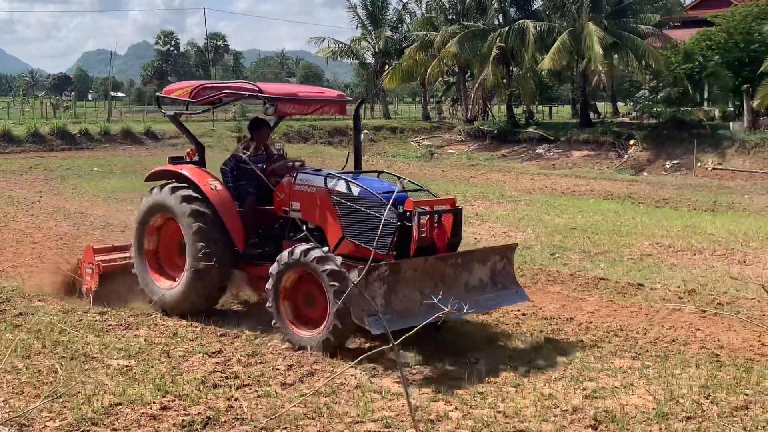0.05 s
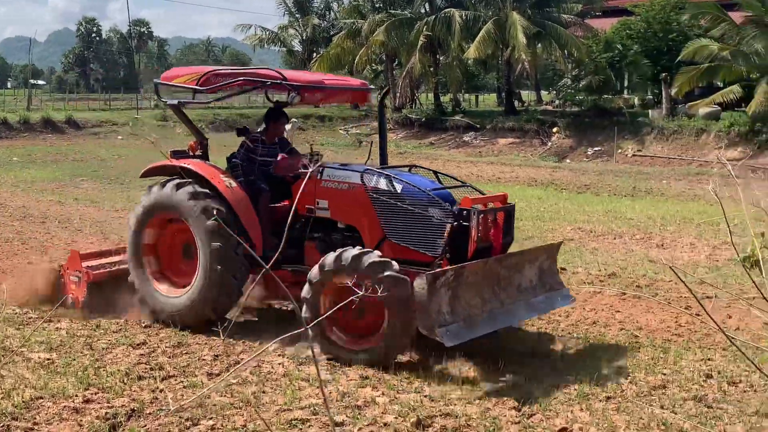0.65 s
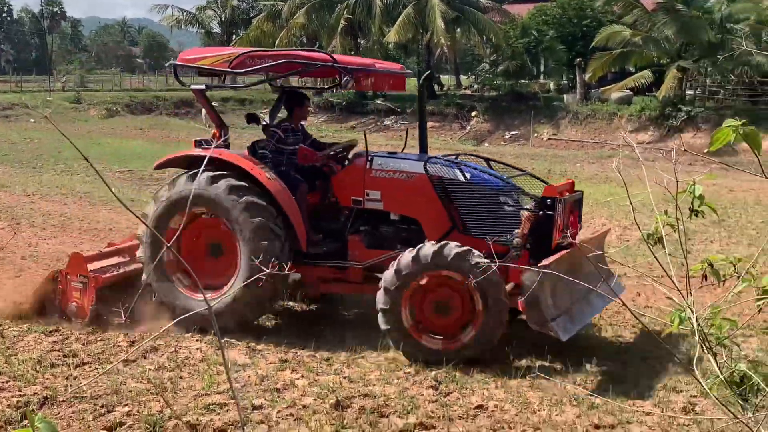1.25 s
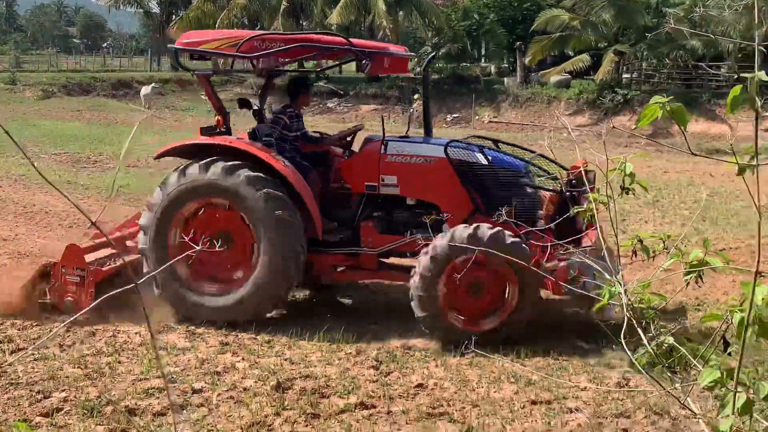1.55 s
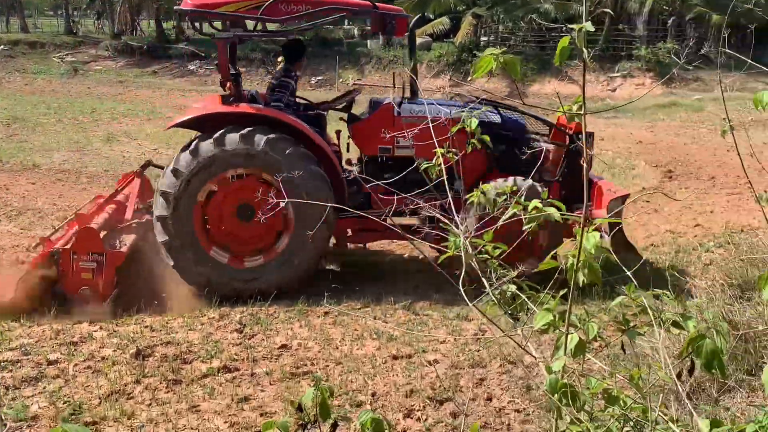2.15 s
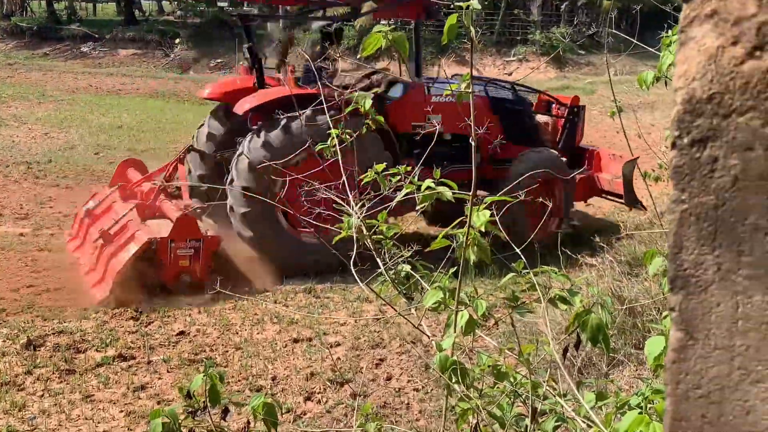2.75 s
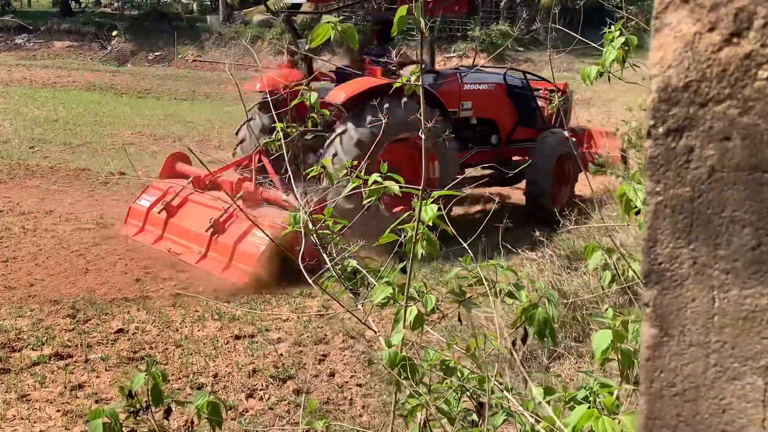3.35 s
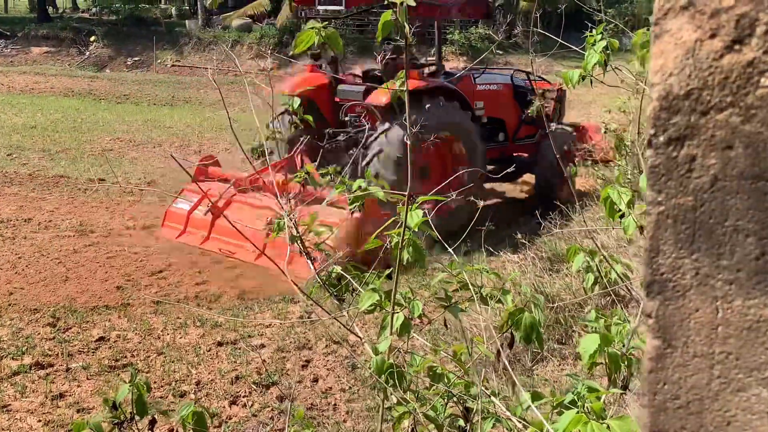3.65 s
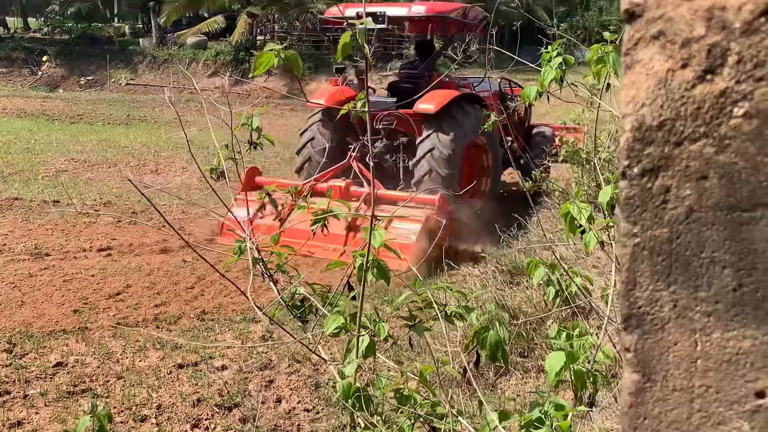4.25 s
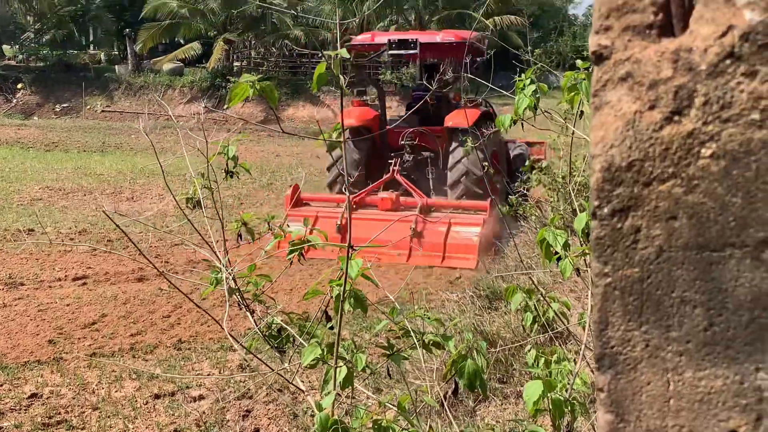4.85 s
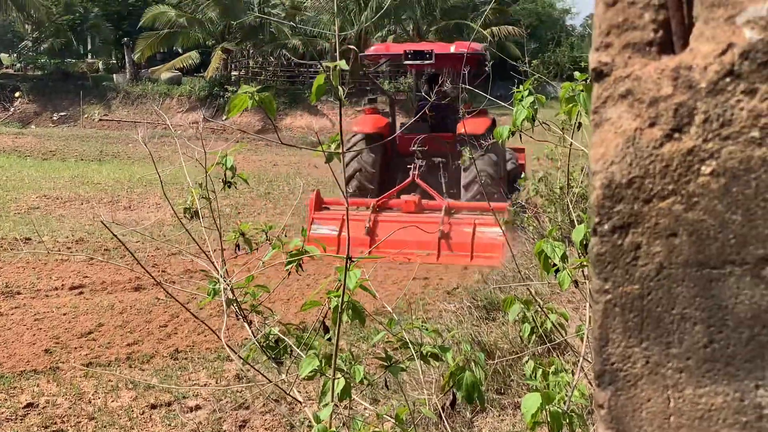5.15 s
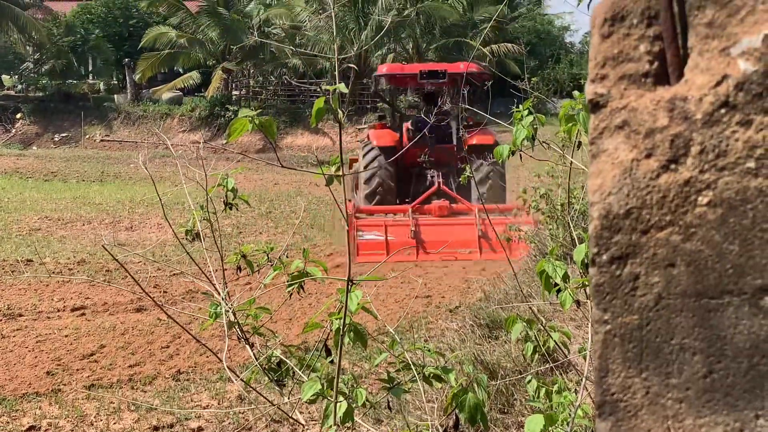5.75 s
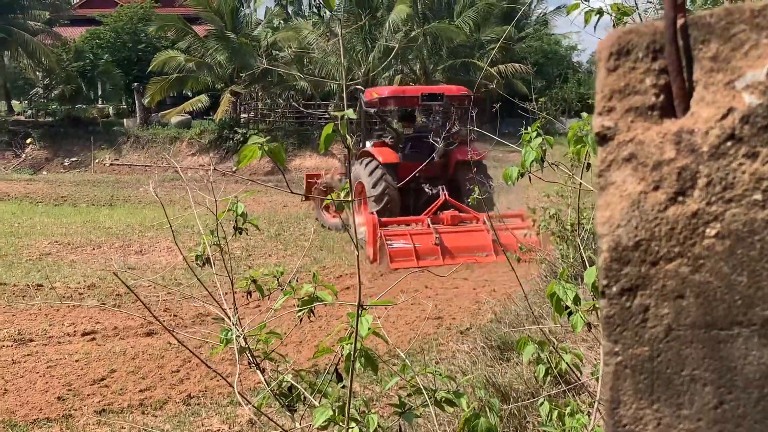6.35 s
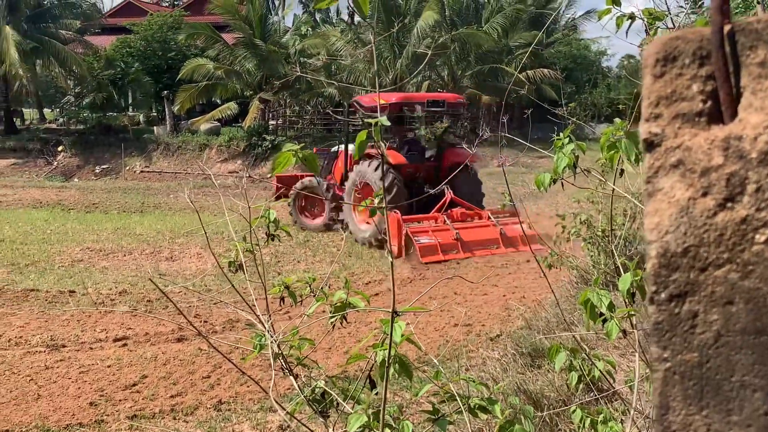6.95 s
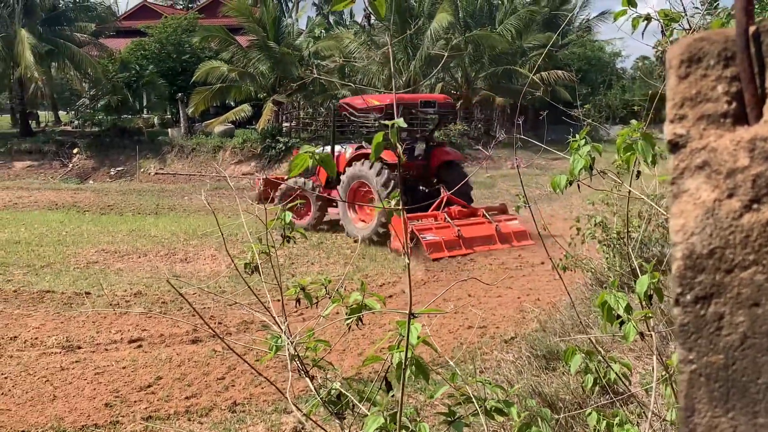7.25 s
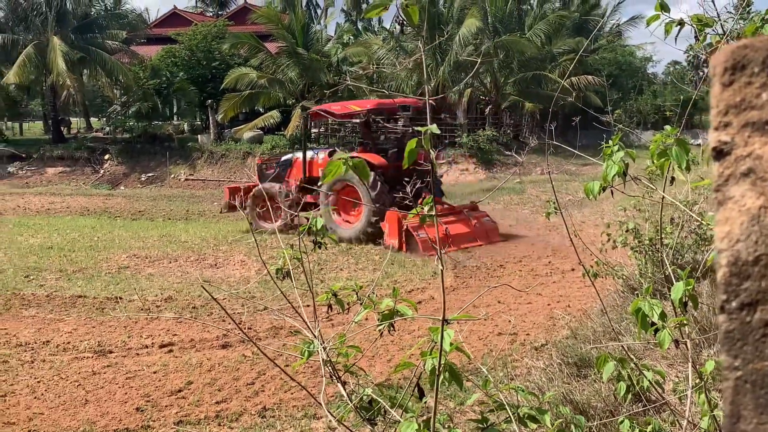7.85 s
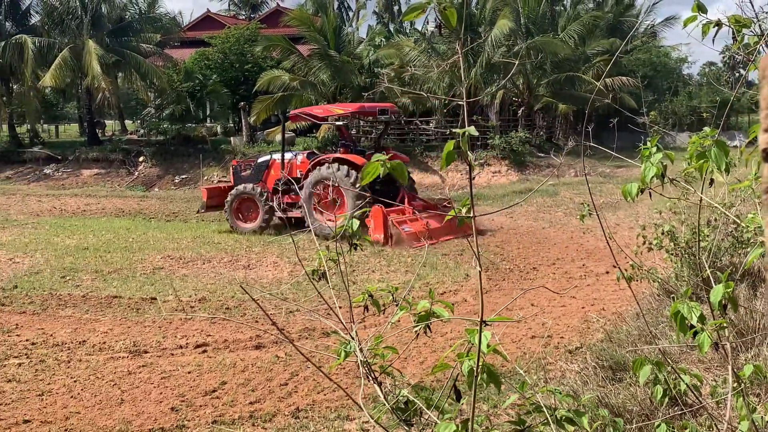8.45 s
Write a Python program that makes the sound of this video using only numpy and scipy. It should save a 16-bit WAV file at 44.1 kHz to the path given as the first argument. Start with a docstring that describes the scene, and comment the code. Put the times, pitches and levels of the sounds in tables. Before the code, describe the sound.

A tractor engine runs steadily, nearing and moving off while its tiller rumbles through earth, with chattering metal and small stone strikes.

```python
"""A four-cylinder diesel tractor approaches at steady revs with a rotary tiller: exhaust pulses drone,
firings make the block knock, gears whine and blades rumble through dry soil. After two seconds it
passes side-on; the tiller's loose flap starts to chatter and small clods fly. As the tractor turns
away its body shadows the engine, dry steel squeaks, and clods and stones strike the hood amid a few
crisp, high cracks. From six seconds on, farther off across the field, a loose pin clinks."""
import sys
import numpy as np
from scipy import signal
from scipy.fft import rfft, irfft, next_fast_len
from scipy.io import wavfile

SR = 44100
rng = np.random.default_rng(int(sys.argv[2]) if len(sys.argv) > 2 else 0)


def inscribe(sig):
    """Save sig as 16-bit PCM at rate SR to the path in sys.argv[1].

    A 1-D sig is mono; a 2-D sig holds one channel per row.
    Samples are clipped to [-1, 1] before scaling.
    """
    pcm = np.round(np.clip(np.atleast_2d(sig).T, -1, 1) * 32767)
    wavfile.write(sys.argv[1], SR, pcm.astype(np.int16))


N = 374409
TIME = np.arange(N) / SR

# The tractor's path: time_s, distance_m, view_deg (0 from the nose, 90 side-on, 180 from behind)
TRACTOR_PATH = [(0, 12.1, 48.3), (1, 10.57, 64.4), (2, 10.52, 95.6), (3, 11, 124.5), (4, 10.8, 155.3),
                (5.5, 14.45, 185), (6.5, 14, 160.5), (7.2, 16.9, 140), (8.49, 17.5, 126.4)]
# Engine speed: time_s, firing_rate_hz
FIRING_RATE = [(0, 69.85), (1.2, 69.7), (2, 69.5), (4.2, 69.5), (5.6, 69.25), (6.3, 69.7), (7.2, 68.6),
               (7.8, 69.1), (8.49, 69.55)]
# Directivity of the three lowest firing harmonics: view_deg, first_db, second_db, third_db
EXHAUST_DIRECTIVITY = [(45, -23.5, -23, -32.5), (73.5, -24, -25, -47), (90.6, -23.5, -29, -34),
                       (106, -26, -37, -37.5), (116.8, -28.5, -27.5, -31.5), (140, -29.5, -25.5, -35.5),
                       (162.4, -31, -29.5, -34.5), (176, -26, -31, -31.5), (180.7, -27, -37, -37)]
# Tones from unequal cylinders: multiple_of_cycle_rate, front_db, rear_db
UNEVEN_ORDERS = [(5, -37, -51), (6, -42, -42.5), (9, -37.5, -49), (10, -39.5, -48.5), (11, -47, -60),
                 (13, -53, -44.5), (14, -58, -42), (16, -60, -42.5), (17, -42, -47), (18, -41.5, -55),
                 (19, -48, -56.5), (23, -48, -68), (26, -48.5, -50.5), (27, -52, -53.5), (29, -46, -58.5),
                 (30, -51, -67)]
# The seventh cycle harmonic, which beats with the second firing harmonic: time_s, level_db
CHUG_LEVEL = [(0, -34.5), (1, -29), (2, -30), (2.5, -41), (6.3, -44), (7.1, -33.5), (7.5, -38.5),
              (8.49, -37)]
# Spectra of the engine's drone, block knock and valve tick: frequency_hz, relative_db
DRONE_SPECTRUM = [(130, -24), (230, -6.5), (330, 0.5), (430, -5), (520, -5.5), (610, -6), (680, -13),
                  (900, -12.5), (1500, -34)]
KNOCK_SPECTRUM = [(500, -25), (690, -10), (800, -2.5), (910, -7.5), (1060, 0.5), (1220, -1.5), (1400, -1),
                  (1600, -6), (1750, -7.5), (1920, -6.5), (2250, -9), (2600, -16.5), (3200, -60)]
TICK_SPECTRUM = [(1800, -5), (2550, -8), (2800, 2.5), (3020, 0), (3300, 3), (3530, -2), (3720, 1.5),
                 (4600, -4.5), (5600, -6.5), (6400, -5.5), (7400, -12), (8800, -9), (11500, -11),
                 (14000, -15)]
# Modes of the thin engine covers: pitch_hz, bandwidth_hz, gain_over_tick_db, aim_deg
COVER_MODES = [(2830, 110, -4, 48), (3200, 150, 2.5, 50), (3000, 160, -1, 69), (3690, 80, 3.5, 67),
               (3370, 160, -2, 83), (2810, 300, -5.5, 108), (4250, 160, -4, 100), (5060, 130, 0, 62)]
# Directivity of the drive's tones: view_deg, gearbox_hum_db, tiller_mesh_db, howl_db
GEAR_DIRECTIVITY = [(45, -41, -42, -44), (57, -38, -37.5, -43), (68, -31.5, -43, -45),
                    (92, -30, -35.5, -37), (103, -43, -55, -44), (113, -45, -58, -50), (122, -34, -50, -48),
                    (128, -36, -39, -44), (134, -38.5, -32.5, -38.5), (141, -42, -34.5, -40),
                    (145, -48, -41, -42.5), (151, -51, -41, -48), (158, -52, -49, -49),
                    (186, -53, -47, -55)]
# Wavering gear and fan tones: pitch_hz, bandwidth_hz, level_over_knock_db
WHINE_TONES = [(810, 23, -22), (1405, 23, -16), (1893, 36, -18), (2210, 19, -24.5), (3775, 24, -18),
               (5160, 200, -16), (8200, 67, -18.5)]
# The tiller's gear mesh: time_s, pitch_hz
MESH_CURVE = [(0, 1402), (1.8, 1394), (3.3, 1385), (7, 1379), (7.4, 1374), (7.9, 1388), (8.49, 1402)]
# Spectra of churned soil, sprayed fine earth and settling dust: frequency_hz, relative_db
RUMBLE_SPECTRUM = [(15, -30), (33, -23), (50, -9), (70, -3.5), (95, 5), (125, -1), (165, -2), (210, -6),
                   (270, -8.5), (350, -20), (450, -20), (560, -36.5)]
SPRAY_SPECTRUM = [(3000, -41), (7000, 4.5), (10500, 9.5), (14000, 4)]
DUST_SPECTRUM = [(7000, -16), (11500, 0), (14000, 4)]
# Modes of the tiller's sheet-steel hood: pitch_hz, bandwidth_hz, gain_db
HOOD_MODES = [(564, 150, -1), (900, 200, -3), (1290, 100, 10), (2800, 110, -3.5), (3460, 150, 9.5),
              (4000, 150, 9), (6350, 76, 2), (6520, 96, 2.5)]
# Spectrum of the loose flap: frequency_hz, relative_db
FLAP_SPECTRUM = [(2400, -11), (2850, 3.5), (3500, 2), (4300, -4), (5200, -29)]
# Big clods bursting on the hood: start_s, relative_db, t60_s
CLOD_HITS = [(3.582, -25.5, 0.049), (3.752, -30, .09), (3.897, -28, 0.081), (4.046, -29, 0.049),
             (4.541, -32, 0.04), (4.685, -36, 0.045), (4.796, -32, .07), (4.816, -32, 0.15),
             (5.419, -35, 0.2), (5.695, -34, 0.066), (6.33, -30.5, 0.045), (6.403, -35.5, .06),
             (6.54, -32, 0.026), (7.258, -30.5, 0.08), (7.69, -29, 0.09), (7.989, -29.5, .16),
             (8.131, -32.5, 0.035), (8.303, -30, 0.12)]
# Rubs of dry steel on the tiller: start_s, length_s, level_db
STEEL_RUBS = [(3.232, .035, -37.5), (3.503, .017, -28), (3.543, .02, -42), (3.738, .012, -38),
              (3.79, .012, -36.5), (3.825, .04, -39.5), (4.07, .03, -43.5), (4.168, .02, -46),
              (4.208, .03, -41.5), (4.648, .015, -47), (4.85, .02, -47), (4.935, .03, -42.5),
              (4.98, .02, -47)]
# Crisp high cracks, two on their own, three the sharp top of stone hits: start_s, relative_db, t60_s
BRIGHT_CRACKS = [(4.214, -34.5, .06), (4.2843, -17.5, 0.004), (4.341, -36, .025), (4.448, -36, .025),
                 (5.405, -32, .025)]
# Stones cracking against the blades: start_s, relative_db, t60_s, hood_drive_db
STONE_HITS = [(4.339, -31.5, .04, -7), (4.447, -32.5, .045, -9), (4.809, -29, .05, -11),
              (5.403, -26.5, .05, -13), (5.544, -32.5, .035, -14), (5.66, -38, .05, -12),
              (6.147, -34, .025, 3), (6.571, -35, .02, -6)]
# Jolts of the loose pin: start_s, level_db
PIN_JOLTS = [(6.148, -34), (6.403, -39), (6.456, -42), (6.772, -42), (6.92, -36), (7.014, -35),
             (7.408, -35), (7.704, -38), (7.959, -38), (8.131, -34), (8.304, -41)]
# Modes of the pin: pitch_hz, gain_db, t60_s
PIN_MODES = [(5730, -8, .03), (6350, -1.5, 0.073), (6560, -12, .03)]
# Sound scattered by ground and bushes: frequency_hz, relative_db
SCATTER_SPECTRUM = [(100, -44), (250, -21), (500, -6), (1000, -9), (2000, -3.5), (4000, -6.5), (9000, -3),
                    (12000, -30.5)]
# Level difference between two close microphones: frequency_hz, left_minus_right_db
STEREO_LEVEL = [(60, -2.5), (130, -3), (250, -4), (500, -2), (1000, 1.5), (1400, -0.5), (1900, 5),
                (2700, 0.5), (4200, 1), (5200, -3.5), (7500, 1.5), (8400, -3), (10000, 0)]
# Their phase difference: frequency_hz, left_lead_rad
STEREO_PHASE = [(100, -.1), (450, -.2), (650, .5), (1000, -.35), (2100, -.4), (3000, .7), (4100, 0),
                (4800, .5), (5250, 2), (5700, .3), (7000, .3), (7900, -.7), (8400, -3.3), (9400, -4.2),
                (9750, -6.2), (10600, -6.5), (11400, -9.3), (12300, -9.5), (13200, -12.5), (13900, -12.7),
                (14700, -15.7)]

REFERENCE_M = 10   # distance at which the spreading gain is 0 dB
HUM_HZ, SHAFT_HZ, SQUEAK_HZ = 408.7, 1458, 5080
COVER_BEAM_DEG, SHAFT_BEAM_DEG, SPRAY_AIM_DEG = 8, 43, 108
FLANK_DEG, FLANK_WIDTH_DEG = 102, 4   # where the rear's timbre takes over, and how gradually
HARD_RISE, SOFT_RISE = .025, .05   # a burst's attack as a share of its t60


def from_db(db):
    """Amplitude ratio: tenfold for every 20 dB."""
    return 10 ** (np.asarray(db) / 20)


def rms_one(x):
    """Normalisation to unit power."""
    return x / np.sqrt(np.mean(x ** 2) + 1e-20)


def in_time(rows):
    """Linear interpolation of each column at every sample."""
    times, *columns = np.transpose(rows)
    return [np.interp(TIME, times, column) for column in columns]


def at_hz(points, hz):
    """Interpolation on a logarithmic frequency axis."""
    known_hz, values = np.transpose(points)
    return np.interp(np.log(hz), np.log(known_hz), values)


def filtered(x, response):
    """Linear filtering: the spectrum is multiplied by response(hz)."""
    size = next_fast_len(N + 8192, real=True)
    hz = np.maximum(np.arange(size // 2 + 1) * SR / size, 1)
    return irfft(rfft(x, size) * response(hz), size)[..., :N]


def coloured(x, spectrum):
    """Spectral shaping to unit power, with a steep roll-off an octave beyond each end."""
    low_hz, high_hz = spectrum[0][0] / 2, 2 * spectrum[-1][0]
    roll_off = lambda hz: 1 + (hz / high_hz) ** 4 + (low_hz / hz) ** 4
    return rms_one(filtered(x, lambda hz: from_db(at_hz(spectrum, hz)) / roll_off(hz)))


def resonance(x, hz, width_hz):
    """A damped resonator with unit gain at its peak."""
    r = np.exp(-np.pi * width_hz / SR)
    feedback = [1, -2 * r * np.cos(2 * np.pi * hz / SR), r * r]
    return signal.lfilter(np.array([1, 0, -1]) * (1 - r * r) / 2, feedback, x + 1e-18)


def drift(rate_hz):
    """Random modulation: unit-power noise, low-passed at rate_hz."""
    step = 40
    r = np.exp(-2 * np.pi * rate_hz * step / SR)
    slow = signal.lfilter([1], [1, -2 * r, r * r], rng.standard_normal(N // step + 2002))[2000:]
    return np.interp(np.arange(N) / step, np.arange(len(slow)), rms_one(slow))


def wavering(turns, width_hz):
    """Narrow-band noise: two random amplitudes in quadrature."""
    phase = 2 * np.pi * turns
    return rms_one(drift(width_hz) * np.cos(phase) + drift(width_hz) * np.sin(phase))


def tone(turns, flutter):
    """A sinusoid near unit power, with slight amplitude and phase modulation."""
    phase = 2 * np.pi * turns + flutter * drift(.71)
    return np.sqrt(2) * (1 + flutter * drift(3.9)) * np.sin(phase)


def view_angle():
    """Angle of radiation: degrees between the tractor's nose and the listener."""
    return in_time(TRACTOR_PATH)[1]


def spreading(loss_db_per_m=0):
    """Gain in dB from spherical spreading and absorption by soft soil and bushes."""
    metres, _ = in_time(TRACTOR_PATH)
    return -20 * np.log10(metres / REFERENCE_M) - loss_db_per_m * (metres - REFERENCE_M)


def beamed(pattern):
    """Directivity and spreading set each tone's level in dB along the path."""
    angles, *columns = np.transpose(pattern)
    return spreading() + np.array([np.interp(view_angle(), angles, column) for column in columns])


def shadowed(front_db, hidden_db, loss_db_per_m=0):
    """Level in dB after spreading and the acoustic shadow behind wheels and body."""
    shadow = np.sin(np.radians(view_angle()) / 2) ** 10
    return front_db + spreading(loss_db_per_m) - hidden_db * shadow


def rear_share():
    """Line of sight: the rear's share of the sound rises as the flank goes by."""
    return .97 / (1 + np.exp((FLANK_DEG - view_angle()) / FLANK_WIDTH_DEG))


def exhaust(cycle):
    """Harmonic series: four puffs a cycle give the main tones; unequal cylinders fill in between."""
    rear = rear_share()
    firing = -sum(from_db(db) * tone(4 * harmonic * cycle, flutter=.1)
                  for harmonic, db in enumerate(beamed(EXHAUST_DIRECTIVITY), 1))
    uneven = sum(from_db(front + rear * (back - front)) * tone(order * cycle + rng.random(), flutter=.25)
                 for order, front, back in UNEVEN_ORDERS)
    chug = from_db(in_time(CHUG_LEVEL)[0]) * tone(7 * cycle, flutter=.15)
    return firing + chug + from_db(spreading()) * uneven


def impacts(cycle, regular, punch, lope_db):
    """Cyclostationary noise: impacts swell at each firing, and a regular share repeats every cycle."""
    period = int(SR * 4 / FIRING_RATE[0][1])
    first, second = rng.standard_normal((2, period))[:, (cycle % 1 * period).astype(int)]
    blend = 1.33 * TIME   # the pattern changes as the engine shows a new side
    repeating = first * np.cos(blend) + second * np.sin(blend)
    noise = np.sqrt(regular) * repeating + np.sqrt(1 - regular) * rng.standard_normal(N)
    since_firing = 4 * cycle % 1
    return noise * (1 + punch * np.exp(-since_firing)) * from_db(lope_db * np.cos(2 * np.pi * cycle))


def engine(cycle, knock_db):
    """Forced vibration: firings shake block and valve gear, and each cover beams its own resonance."""
    drone = coloured(impacts(cycle, regular=.3, punch=.22, lope_db=0), DRONE_SPECTRUM)
    drone *= from_db(shadowed(-30, hidden_db=6.5, loss_db_per_m=.67))
    knock = coloured(impacts(cycle, regular=.08, punch=1.15, lope_db=.8), KNOCK_SPECTRUM)
    knock *= from_db(knock_db)
    knock -= .5 * rear_share() * resonance(knock, 2050, 320)   # wheels and cab hide the harsh band
    valves = impacts(cycle, regular=.05, punch=.55, lope_db=.8) * from_db(2.2 * np.tanh(drift(200)))
    tick = from_db(shadowed(-32, hidden_db=11.5)) * coloured(valves, TICK_SPECTRUM)
    angle = view_angle()
    covers = sum(from_db(db) * np.exp(-((angle - aim) / COVER_BEAM_DEG) ** 2) * resonance(tick, hz, width)
                 for hz, width, db, aim in COVER_MODES)
    return drone + knock + tick + covers


def gears(cycle, knock_db):
    """Periodic tooth contact radiates tones; the tiller's mesh throbs once per engine cycle."""
    engine_s = cycle / cycle[-1] * TIME[-1]   # a clock that follows the engine speed
    beyond_m = in_time(TRACTOR_PATH)[0] - REFERENCE_M
    loss_db = np.outer((1.6, 1.25, .85), beyond_m)
    hum_db, mesh_db, howl_db = beamed(GEAR_DIRECTIVITY) - loss_db
    whines = sum(from_db(knock_db + db) * wavering(hz * engine_s, width) for hz, width, db in WHINE_TONES)
    hum = from_db(hum_db) * tone(HUM_HZ * engine_s + .053 * drift(5.4), flutter=.08)
    throb = 1 + .3 * np.cos(2 * np.pi * cycle)
    mesh_turns = np.cumsum(in_time(MESH_CURVE)[0]) / SR
    mesh = from_db(mesh_db + 2 * drift(20)) * throb * tone(mesh_turns + .13 * drift(14), flutter=.15)
    howl = from_db(howl_db) * tone(32 * cycle + .14 * drift(6), flutter=.3)
    astern = np.exp(-((view_angle() - 180) / SHAFT_BEAM_DEG) ** 2)
    shaft = from_db(-51 + spreading()) * astern * wavering(SHAFT_HZ * engine_s, width_hz=5.1)
    return whines + hum + mesh + howl + shaft


def hood(force):
    """Modal response: each mode's share wanders, as it depends on where the hood is hit."""
    return sum(resonance(force * from_db(db + 5 * np.tanh(drift(15))), hz, width)
               for hz, width, db in HOOD_MODES)


def tiller(fines_per_s=3000, grit_per_s=150):
    """Random impacts sum to noise: blades churn soil, spray earth and fling grit; dust settles."""
    bite_db = 1.5 * drift(3.5)   # varies with the soil
    rumble_db = shadowed(-28.5, hidden_db=-.5) + bite_db   # radiates slightly more to the rear
    rumble = from_db(rumble_db) * coloured(rng.standard_normal(N), RUMBLE_SPECTRUM)
    clumps = from_db(5 * np.tanh(drift(25)))
    fines = (rng.random(N) < fines_per_s / SR) * rng.standard_normal(N) * clumps
    grit = (rng.random(N) < grit_per_s / SR) * rng.uniform(-1, 1, N) * clumps
    dust = from_db(-60 + spreading()) * coloured(rng.standard_normal(N), DUST_SPECTRUM)
    off_axis = np.sin(np.radians(view_angle() - SPRAY_AIM_DEG)) ** 2   # spray exits the hood's open sides
    spray = from_db(-37 + spreading(loss_db_per_m=7.5) - 7 * off_axis) * coloured(fines, SPRAY_SPECTRUM)
    patter = from_db(shadowed(-42, hidden_db=16)) * rms_one(hood(grit))
    return rumble + dust + spray + patter


def flap_chatter(knocks_per_s=400):
    """Shot noise: a loose flap knocks on the hood, heard from the side and behind."""
    knocks = (rng.random(N) < knocks_per_s / SR) * rng.uniform(-.48, 1, N)
    knocks *= from_db(2.2 * np.tanh(drift(21)))
    end_on = np.cos(np.radians(view_angle())) ** 2
    return rear_share() * from_db(-40.5 + spreading() - 8.5 * end_on) * coloured(knocks, FLAP_SPECTRUM)


def bursts(events, band_hz, rise, trickle_per_s=1500):
    """Exponential decay: each blow crumbles in uneven lumps and sheds a longer trickle of grit."""
    sound = np.zeros(N)
    band = signal.butter(1, band_hz, "band", fs=SR, output="sos")
    lumps = rms_one(from_db(5 * np.tanh(drift(220))))
    grains = rng.standard_normal(N) * (rng.random(N) < .25) * lumps
    grit = rng.choice([-1, 1], N) * (rng.random(N) < trickle_per_s / SR)
    for start_s, db, t60 in events:
        start = int(start_s * SR)
        span = slice(start, min(N, start + SR // 4))
        age = TIME[span] - TIME[start]
        crumble = grains[span] * from_db(-60 * age / t60)
        trickle = grit[span] * from_db(-6.5 - 60 * age / (3.5 * t60))
        attack = 1 - np.exp(-age / (rise * t60))
        sound[span] += from_db(db + 14) * signal.sosfilt(band, (crumble + trickle) * attack)
    return sound


def crumbs(per_s=7, t60=.04):
    """A Poisson process of small clods, heard as the rear shows: rows of start_s, relative_db, t60_s."""
    level_db = -36 + spreading()
    starts = np.flatnonzero(rng.random(N) < per_s * rear_share() / SR)
    return [(i / SR, level_db[i] + 2.5 * rng.standard_normal(), t60) for i in starts]


def debris():
    """Impact excitation: dull clods and sharper stones ring the hood; the highest cracks do not."""
    earth = bursts(CLOD_HITS + crumbs(), band_hz=(470, 3600), rise=SOFT_RISE)
    cracks = bursts(BRIGHT_CRACKS, band_hz=(6500, 15000), rise=HARD_RISE)
    stone_band_hz = (300, 8500)
    stones = bursts([row[:3] for row in STONE_HITS], stone_band_hz, HARD_RISE)
    hood_hits = [(start_s, db + drive_db, t60) for start_s, db, t60, drive_db in STONE_HITS]
    blows = bursts(hood_hits, stone_band_hz, HARD_RISE)
    return earth + cracks + stones + hood(blows + from_db(-7) * earth)


def squeaks(attack_s=.002, ring_t60=.6):
    """Stick-slip friction: dry steel catches, sings on one ragged note and rings on faintly."""
    power = 0
    for start_s, length_s, db in STEEL_RUBS:
        age = np.maximum(TIME - start_s, 0)
        rub = np.exp(-np.minimum(age / length_s, 2) ** 4)
        ring = from_db(-17 - 60 * age / ring_t60)
        power += (from_db(db) * age / (age + attack_s) * np.maximum(rub, ring)) ** 2
    note = tone(SQUEAK_HZ * TIME + .067 * drift(70), flutter=.1)
    return np.sqrt(power) * note * from_db(3.5 * np.tanh(drift(120)))


def pin_clinks():
    """Free vibration: each jolt rings the pin's damped modes in a slightly different balance."""
    sound = np.zeros(N)
    for start_s, db in PIN_JOLTS:
        start = int(start_s * SR)
        age = TIME[:min(N - start, SR // 4)]
        for hz, mode_db, t60 in PIN_MODES:
            decay = from_db(db + mode_db + rng.standard_normal() - 60 * age / t60)
            sound[start:start + len(age)] += decay * np.sin(2 * np.pi * hz * age)
    return sound


def field(direct, scatter_db, t60, renew_s=.3):
    """Multipath propagation: direct sound and changing echoes reach two close microphones."""
    age = TIME[:SR // 4]
    hop = int(renew_s * SR)   # new echo paths as the tractor moves on
    fade = signal.windows.cosine(2 * hop)
    source = filtered(direct, lambda hz: from_db(at_hz(SCATTER_SPECTRUM, hz) + scatter_db))
    source = np.pad(source, (hop, 2 * hop))
    scattered = np.zeros((2, len(source) + len(age)))
    for start in range(0, N + hop, hop):
        echoes = rng.standard_normal((2, len(age))) * from_db(-60 * age / t60)
        echoes /= np.sqrt(np.sum(echoes ** 2, axis=1, keepdims=True))
        piece = signal.fftconvolve([source[start:start + 2 * hop] * fade], echoes, axes=1)
        scattered[:, start:start + piece.shape[1]] += piece
    sides = np.array([[.5], [-.5]])
    pair = lambda hz: from_db(sides * at_hz(STEREO_LEVEL, hz)) * np.exp(1j * sides * at_hz(STEREO_PHASE, hz))
    return filtered(direct + scattered[:, hop:hop + N], pair)


def scene():
    """Superposition of tractor and tiller in the open field."""
    firing_hz, = in_time(FIRING_RATE)
    cycle = np.cumsum(firing_hz / 4) / SR   # four-stroke cycles elapsed
    knock_db = shadowed(-31.5, hidden_db=7.5)
    machine = exhaust(cycle) + engine(cycle, knock_db) + tiller() + flap_chatter()
    tones = gears(cycle, knock_db) + squeaks()
    strikes = debris() + pin_clinks()
    return (field(machine, scatter_db=2, t60=.14)
            + field(tones, scatter_db=-7, t60=.3)
            + field(strikes, scatter_db=1, t60=.11))


def record(dry, cutoff_hz=14800):
    """Band limiting: a steep low-pass filter cuts the top of the treble."""
    return signal.sosfilt(signal.ellip(10, .2, 80, cutoff_hz, fs=SR, output="sos"), dry)


dry = scene()
out = record(dry)
inscribe(out)
```